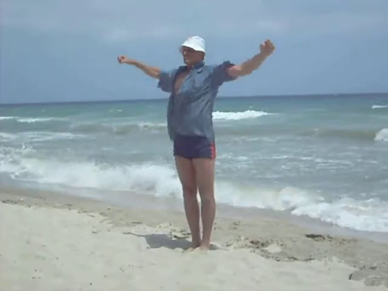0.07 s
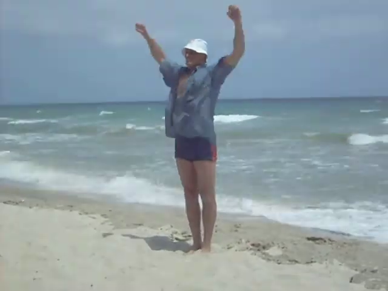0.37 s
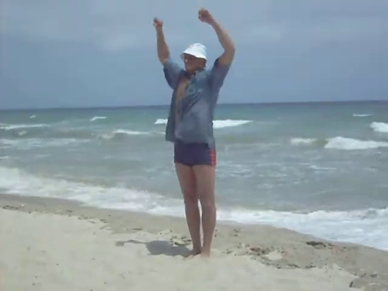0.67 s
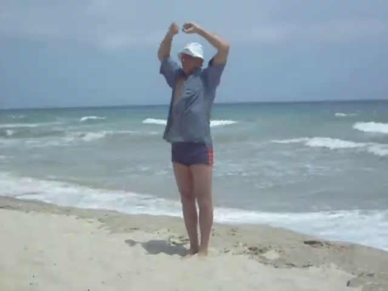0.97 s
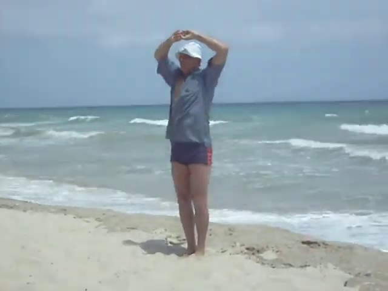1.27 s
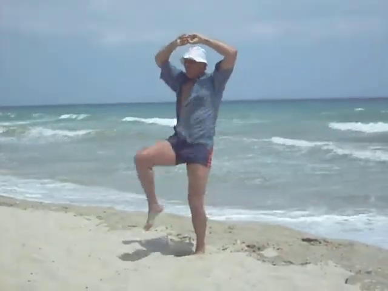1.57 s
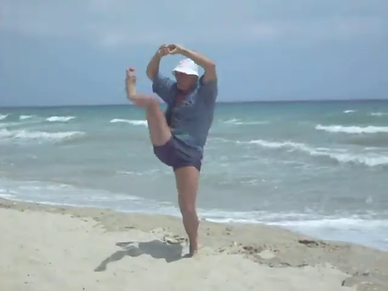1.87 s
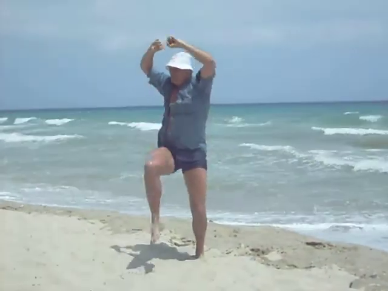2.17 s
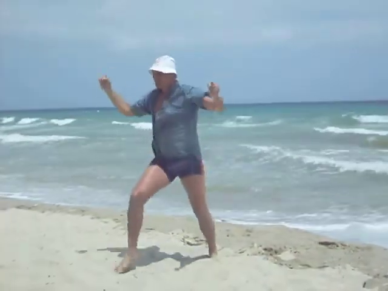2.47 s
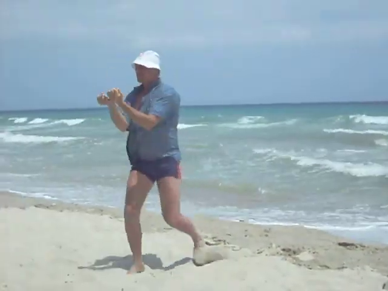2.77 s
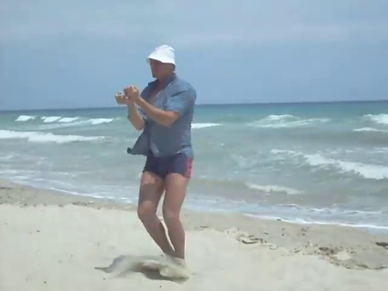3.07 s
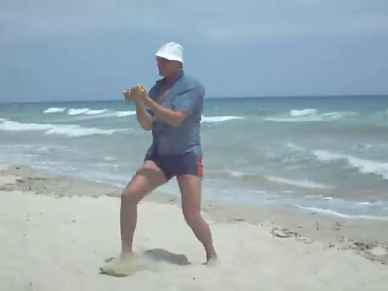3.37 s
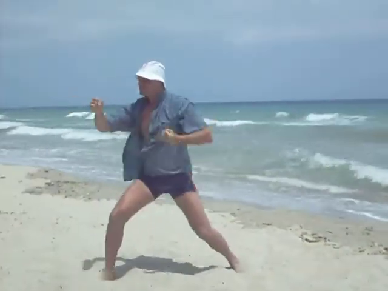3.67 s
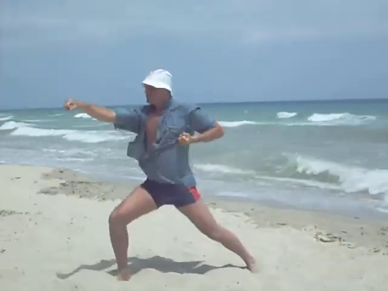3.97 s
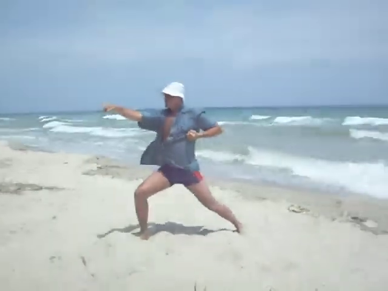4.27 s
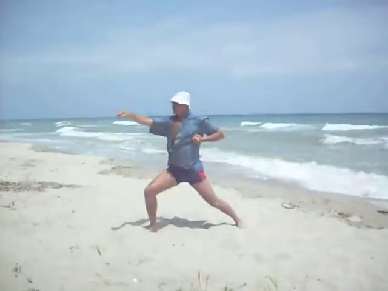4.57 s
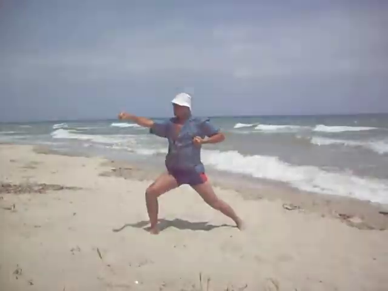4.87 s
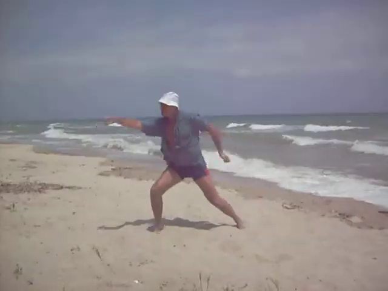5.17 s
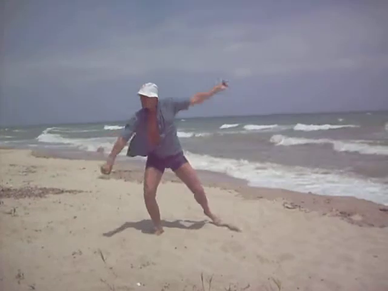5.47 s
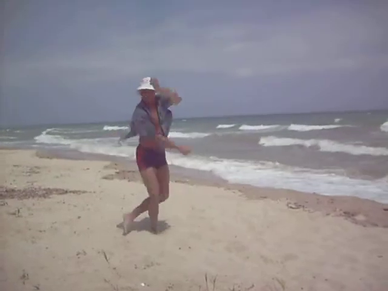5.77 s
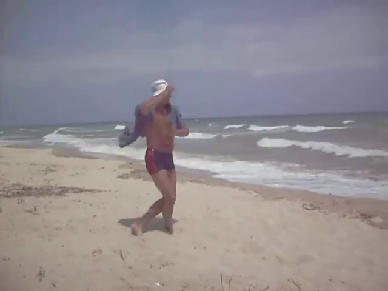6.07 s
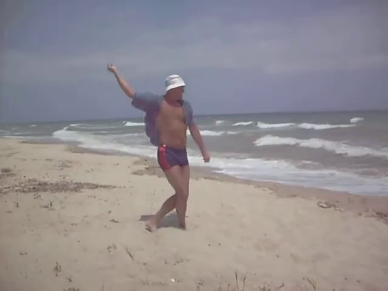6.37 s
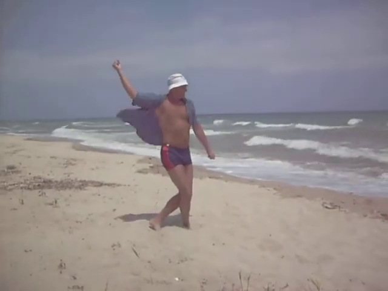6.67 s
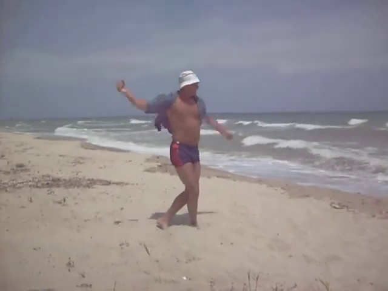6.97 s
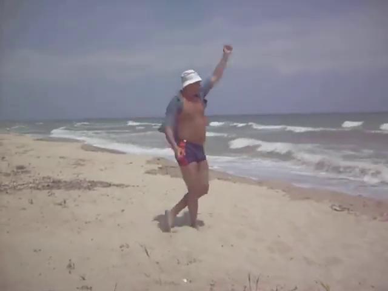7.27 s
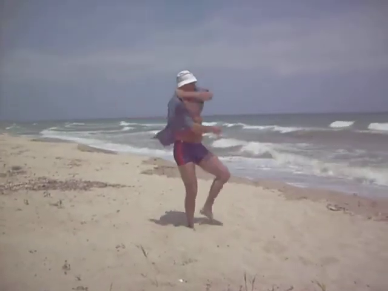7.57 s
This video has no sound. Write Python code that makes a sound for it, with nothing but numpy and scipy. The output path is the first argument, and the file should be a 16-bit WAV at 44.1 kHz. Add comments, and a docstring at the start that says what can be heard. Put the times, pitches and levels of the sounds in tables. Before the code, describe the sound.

Small waves wash onto a sandy beach, a steady roar of tumbling water topped by a slightly thin, foamy hiss. From the start, gusts of wind rumble and flutter on the microphone with quick, dull slaps, easing after about 1.8 seconds to lighter puffs. Short, dry clicks tick irregularly through the sound, most often in the first two seconds. From around 2.5 seconds a wave builds, and it breaks at 3.8 seconds. At 3.9 seconds everything cuts abruptly to total silence. At 4.7 seconds the surf snaps back, followed by the strongest wind, thumping and rasping on the microphone around 5 seconds, with more clicks. The gusts continue until about 6.3 seconds and then weaken. From about 7 seconds another wave swells, with a few last ticks, until the end at roughly 7.6 seconds.

```python
"""Small waves break on a windy sand beach: tumbling water roars, and bursting bubbles hiss through
the resonance of a pocket camera's microphone near 3 kHz. Turbulent wind rumbles at the microphone
port and single eddies slap it. The sound track ticks where it skips at picture frames,
and an edit leaves a silent gap just as a wave breaks."""
import sys
import numpy as np
from scipy import signal
from scipy.fft import rfft, irfft, next_fast_len
from scipy.io import wavfile
from scipy.ndimage import uniform_filter1d, map_coordinates

SR = 44100
rng = np.random.default_rng(int(sys.argv[2]) if len(sys.argv) > 2 else 0)


def file_out(sig):
    """Save sig as 16-bit WAV at sys.argv[1]."""
    # one column per channel
    cols = np.atleast_2d(sig).T
    # limit, then scale
    lim = np.clip(cols, -1, 1)
    pcm = np.round(lim * 32767).astype(np.int16)
    wavfile.write(sys.argv[1], SR, pcm)


N = 336483
TIME = np.arange(N) / SR


def amp(db):
    """Amplitude ratio: tenfold for every 20 dB."""
    return 10 ** (np.asarray(db) / 20)


def unit(x):
    """Normalisation to an rms of 1."""
    return x / np.sqrt(np.mean(x ** 2) + 1e-20)


def wobble(rate_hz):
    """Smooth random modulation: a spline through rate_hz Gaussian values a second."""
    return map_coordinates(rng.standard_normal(int(N * rate_hz / SR) + 4), [TIME * rate_hz])


def filtered(x, response):
    """Linear filtering: the spectrum of x is multiplied by response(hz)."""
    size = next_fast_len(N + SR // 2)
    return irfft(rfft(x, size) * response(np.fft.rfftfreq(size, 1 / SR)), size)[:N]


def coloured(x, spectrum):
    """Spectral shaping by (frequency_hz, gain_db) points on a log axis, scaled to rms 1."""
    frequency_hz, gain_db = np.transpose(spectrum)
    return unit(filtered(x, lambda hz: amp(np.interp(np.log(hz + 1), np.log(frequency_hz), gain_db))))


def patchy(depth_db):
    """Random modulation of white noise in small patches of time and frequency."""
    cells = signal.stft(rng.standard_normal(N), nperseg=512)[2]
    patches = uniform_filter1d(rng.standard_normal(cells.shape), size=5, axis=0)
    patches = uniform_filter1d(patches, size=16, axis=1)
    return signal.istft(cells * amp(depth_db * unit(patches)), nperseg=512)[1][:N]


def ticks():
    """A discontinuity is a broadband click: the track jumps between frames and relaxes exponentially."""
    # prominent skips: time_s, level_db (before the common gain)
    skips = [(0.0194, -27), (0.0862, -26), (0.1191, -28.5), (0.2523, -29.5), (0.3192, -32), (0.5526, -28),
             (0.5861, -31), (0.7193, -30), (0.7856, -27), (0.819, -33), (1.0196, -30.5), (1.0859, -30.5),
             (1.2526, -29.5), (1.3194, -25.5), (1.486, -27.5), (1.7524, -31.5), (1.7858, -30),
             (1.9859, -33), (2.0188, -33), (2.7856, -32), (2.9522, -32), (3.5523, -29.5), (4.7531, -28),
             (4.8199, -25.5), (4.9521, -27.5), (5.1522, -28.5), (5.5523, -31.5), (5.9184, -33),
             (5.9853, -31.5), (6.1519, -33), (6.1853, -32), (6.3854, -31), (6.4188, -28.5), (6.4522, -32),
             (6.6184, -30), (7.1851, -27), (7.2185, -30), (7.3851, -24.5)]
    first_frame_s, frame_rate_hz, relax_hz = 0.0206, 30.004, 3000
    faint_chance, common_gain_db = 0.43, 14
    borders_s = np.arange(first_frame_s, TIME[-1], 1 / frame_rate_hz)
    chance, size, direction = rng.random((len(borders_s), 3)).T
    heights = (chance < faint_chance) * amp(-47 + 14 * size)
    for time_s, level_db in skips:
        heights[np.abs(borders_s - time_s).argmin()] = amp(level_db)
    jumps = np.zeros(N)
    jumps[(borders_s * SR).astype(int)] = np.sign(direction - 0.5) * heights * amp(common_gain_db)
    return signal.lfilter([1], [1, -np.exp(-2 * np.pi * relax_hz / SR)], jumps)


def wind_strength():
    """Incoherent powers add: gusts over a steady breeze give rumble and flutter envelopes in dB."""
    # gusts at the port: peak_s, rumble_db, width_s, flutter_db (relative to the rumble)
    gusts = [(0.15, -30.5, 0.19, -5.5), (0.494, -34, 0.11, -3.5), (0.85, -31.5, .075, 1.5),
             (1.105, -28, 0.071, -5.5), (1.28, -34, .16, 1), (1.73, -32, 0.074, -11),
             (2.06, -37.5, 0.25, -2), (2.68, -31.5, 0.04, -8), (2.98, -46.5, 0.33, 1),
             (3.396, -35, 0.056, -3.5), (3.63, -36.5, .17, 5), (4.928, -28.5, 0.16, -0.5),
             (5.103, -29.5, 0.14, 3.5), (5.32, -31.5, 0.08, -2.5), (5.577, -30, 0.065, -6),
             (5.804, -31.5, 0.15, -4.5), (6.202, -30.5, 0.11, -5), (6.62, -36, 0.18, -2.5),
             (7.08, -39.5, 0.11, 5.5)]
    breeze_rumble_db, breeze_flutter_db = -50, -45
    rumble_power = np.full(N, amp(breeze_rumble_db) ** 2)
    flutter_power = np.full(N, amp(breeze_flutter_db) ** 2)
    for peak_s, rumble_db, width_s, flutter_db in gusts:
        age = (TIME - peak_s) / width_s
        power = amp(rumble_db) ** 2 * np.exp(-(age / np.where(age < 0, 0.99, 1.05)) ** 2)
        rumble_power += power
        flutter_power += power * amp(flutter_db) ** 2
    return 10 * np.log10(rumble_power), 10 * np.log10(flutter_power)


def wind(rumble_db, flutter_db):
    """Turbulent pressure at the port: large whirls rumble, smaller ones flutter in quick lumps."""
    # spectra of the large and the small whirls: frequency_hz, gain_db
    rumble_spectrum = [(8, -7.5), (25, -4.5), (50, -0.5), (100, -3), (170, -7), (350, -17.5), (1000, -77)]
    flutter_spectrum = [(30, -18.5), (90, -4), (160, -1), (320, 0), (650, -8), (1000, -17.5), (2000, -25.5),
                        (5000, -57.5)]
    rumble = coloured(rng.standard_normal(N) * amp(2 * wobble(rate_hz=25)), rumble_spectrum)
    lumps = amp(6.3 * np.tanh(wobble(rate_hz=110)))
    flutter = coloured(rng.standard_normal(N) * lumps, flutter_spectrum)
    return amp(rumble_db + 2) * rumble + amp(flutter_db) * flutter


def small_eddies(flutter_db):
    """Random arrivals: rows for eddies(), at levels that follow the flutter."""
    rate_hz, over_flutter_db, width_s, rasp_db = 8, 4, 0.0066, -11
    peaks_s = rng.uniform(0, N / SR, int(rate_hz * N / SR))
    return [(s, flutter_db[int(s * SR)] + over_flutter_db, width_s, rasp_db) for s in peaks_s]


def eddies(flutter_db):
    """Pressure transients: each eddy rises fast and falls more slowly; sharp ones rasp on the port rim."""
    # hardest eddies: peak_s, level_db, width_s, rasp_db (relative, before the common rasp gain)
    hard_eddies = [(0.026, -18, 0.0097, -18), (0.0356, -20, 0.0091, -14), (0.282, -18.5, 0.0043, -12.5),
                   (0.4057, -23, 0.0087, -9), (0.4887, -23.5, .014, -6), (0.57, -18, .0047, -12),
                   (0.842, -27.5, 0.015, -11), (0.8694, -24, 0.011, -11), (0.98, -20, 0.0048, -11),
                   (1.0054, -21.5, .005, -15), (1.086, -19, .005, -12), (1.095, -22, .012, -23),
                   (1.1097, -19.5, .0065, -11), (1.184, -23, 0.0056, -10), (1.255, -21.5, 0.006, -20),
                   (1.275, -22, 0.0048, -22), (1.4025, -21, 0.0049, -26), (1.4773, -20.5, 0.0094, -24),
                   (1.4887, -22.5, 0.0078, -26), (1.555, -26.5, 0.0056, -6), (1.748, -27.5, 0.013, -13),
                   (1.984, -24.5, 0.0052, -19), (2.656, -24.5, 0.0076, -20), (2.702, -26.5, 0.0085, -23),
                   (3.593, -22.5, .008, -12), (3.67, -24, 0.006, -14), (3.699, -22, .0047, -20),
                   (4.801, -17.5, .0064, -8), (4.837, -23, 0.019, -5.5), (4.91, -24, .006, 2),
                   (4.9215, -15.5, 0.0046, -18), (4.956, -13.5, 0.0068, -13), (4.9696, -20, 0.0093, -1.5),
                   (5.003, -15, .0055, -3), (5.0153, -17, 0.0085, -4), (5.032, -24, 0.01, -14),
                   (5.058, -13, 0.0076, -7), (5.072, -18, 0.0089, -24), (5.1504, -18, 0.0076, -16),
                   (5.2863, -16.5, 0.0027, -22), (5.393, -19.5, 0.0062, -25), (5.7327, -16, 0.0038, -21),
                   (6.009, -24.5, 0.0046, -8), (6.19, -21.5, 0.0055, -9), (6.266, -22, .005, -25),
                   (6.332, -24.5, .011, -26)]
    # spectra of the slap on the port and the rasp on its rim: frequency_hz, gain_db
    slap_spectrum = [(20, -15), (90, -3.5), (280, 4), (450, 0), (620, -2.5), (850, -12.5), (1200, -18.5),
                     (2500, -41), (5000, -67)]
    rasp_spectrum = [(300, -15), (900, 7), (1400, 6.5), (2000, 1.5), (2900, 1.5), (3500, -13.5),
                     (4300, -29), (8000, -53)]
    slap_envelope, rasp_envelope = np.zeros(N), np.zeros(N)
    for peak_s, level_db, width_s, rasp_db in hard_eddies + small_eddies(flutter_db):
        near = slice(max(0, round((peak_s - 0.04) * SR)), round((peak_s + 0.04) * SR))
        age = (TIME[near] - peak_s) / width_s
        pulse = np.exp(-age ** 2 * np.where(age < 0, 2.2, 1.2))
        slap_envelope[near] += amp(level_db) * pulse
        # squaring confines the rasp to the eddy's fastest moment
        rasp_envelope[near] += amp(level_db + rasp_db) * pulse ** 2
    # the swirl is levelled, so it sets how an eddy swings but not how strongly
    swirl = signal.hilbert(coloured(rng.standard_normal(N), slap_spectrum))
    swirl_power = np.abs(uniform_filter1d(np.abs(swirl) ** 2, size=260))
    swing = unit(swirl.real / np.sqrt(swirl_power + 1e-9))
    rasp = coloured(rng.standard_normal(N) * amp(4 * wobble(rate_hz=600)), rasp_spectrum)
    return slap_envelope * swing + amp(2.5) * rasp_envelope * rasp


def surf():
    """Random sources sum to noise: water roars, and bursting bubbles excite the microphone resonance."""
    # a wave builds, breaks and drains, then the next builds: time_s, level_db
    wave_levels = [(0, -31), (1.4, -35.5), (2.5, -34), (3.65, -29), (3.82, -25), (4.72, -29.5), (5.3, -32),
                   (6.9, -32.5), (7.4, -28)]
    # spectra of the tumbling water and its foam: frequency_hz, gain_db
    roar_spectrum = [(30, -25.5), (120, -11.5), (350, -1.5), (520, -3.5), (760, 2), (1000, -1.5),
                     (1450, -0.5), (1850, -3.5), (2300, -5.5), (3200, -6.5), (4500, -40.5)]
    foam_spectrum = [(500, -21.5), (1900, -17.5), (2350, -14), (2600, -6), (2850, 0), (3080, -3),
                     (3350, -8), (3650, -14), (4100, -22), (5200, -27.5), (7000, -37), (10000, -43.5),
                     (11500, -52)]
    roar_lead_s, roar_offset_db, roar_ceiling_db = 0.09, -3, -30
    fizz_hz, fizz_db_per_db, pivot_db = 3870, 0.85, -32
    time_s, level_db = np.transpose(wave_levels)
    # the water tumbles before it foams, and its roar levels off while the foam still swells
    roar_db = np.interp(TIME + roar_lead_s, time_s, level_db) + roar_offset_db
    roar = amp(np.minimum(roar_db, roar_ceiling_db)) * coloured(patchy(depth_db=0.73), roar_spectrum)
    bursts = patchy(depth_db=0.7) * amp(0.78 * wobble(rate_hz=500) + 0.25 * wobble(rate_hz=6.2))
    bubbles = coloured(bursts, foam_spectrum)
    # the high fizz swells and fades less than the rest of the foam
    fizz = filtered(bubbles, lambda hz: 1 - 1 / (1 + (hz / fizz_hz) ** 20))
    foam_db = np.interp(TIME, time_s, level_db)
    fizz_db = pivot_db + fizz_db_per_db * (foam_db - pivot_db)
    foam = amp(foam_db) * (bubbles - fizz) + amp(fizz_db) * fizz
    return roar + amp(0.4) * foam


def scene():
    """Superposition of surf, wind and eddies at one microphone."""
    rumble_db, flutter_db = wind_strength()
    return (surf() + wind(rumble_db, flutter_db) + eddies(flutter_db))[None]


def record(dry):
    """Band limiting and gating: the camera adds ticks and rolls off the treble; the edit mutes a gap."""
    # silent gap: start_s, end_s
    gap = (3.8867, 4.7202)
    rolloff_hz, cutoff_hz = 11300, 12285
    track = filtered(dry[0] + ticks(), lambda hz: np.exp(-(hz / rolloff_hz) ** 14))
    track *= (TIME < gap[0]) | (TIME > gap[1])
    return filtered(track, lambda hz: np.clip((cutoff_hz - hz) / 100, 0, 1))[None]


dry = scene()
out = record(dry)
file_out(out)
```